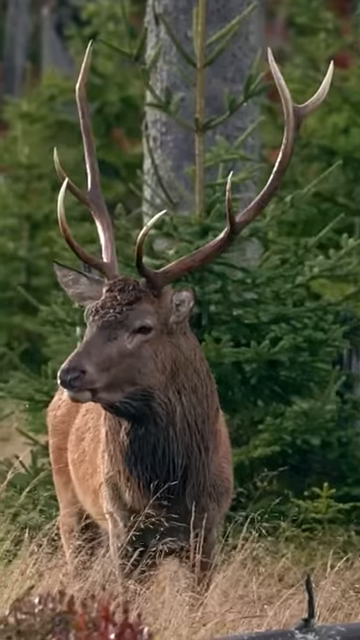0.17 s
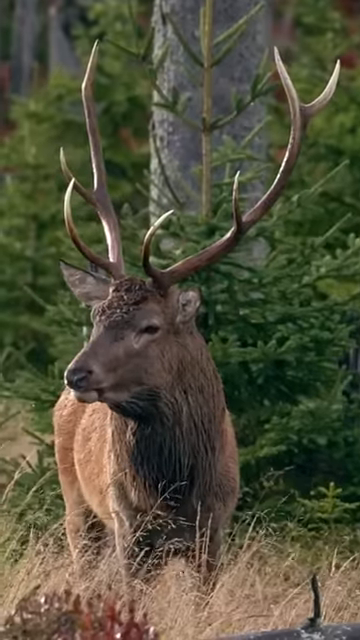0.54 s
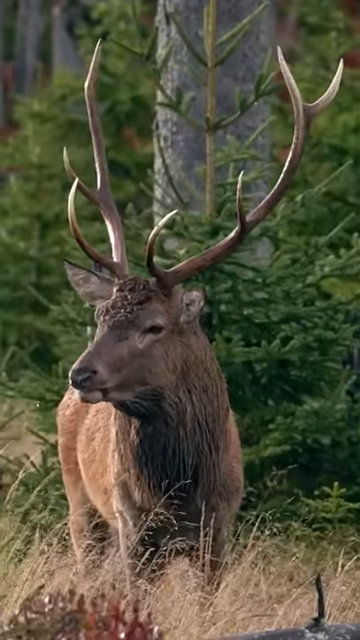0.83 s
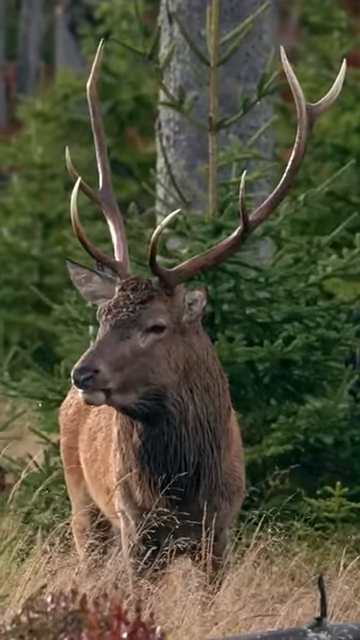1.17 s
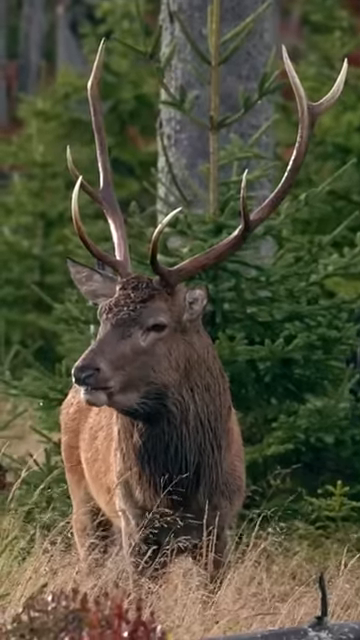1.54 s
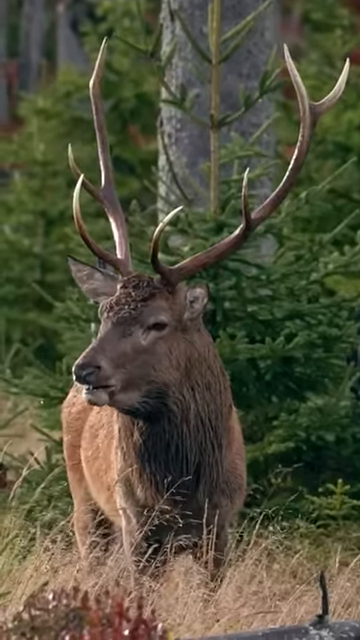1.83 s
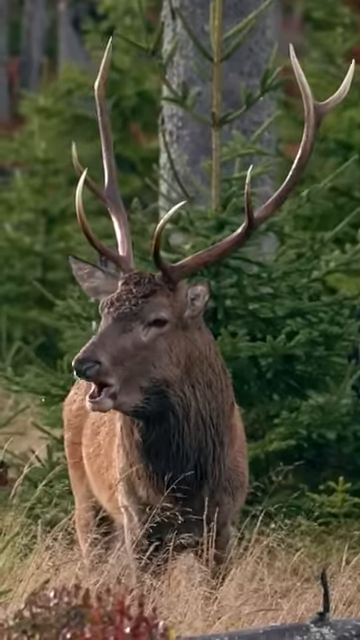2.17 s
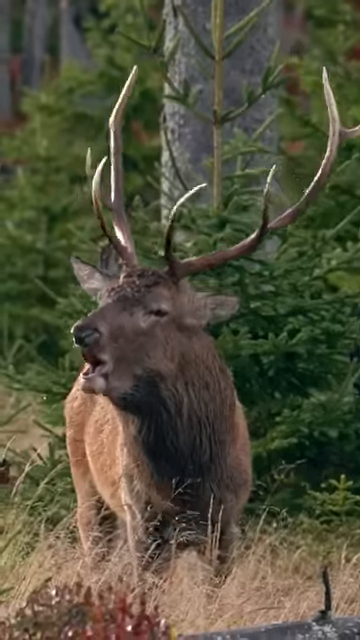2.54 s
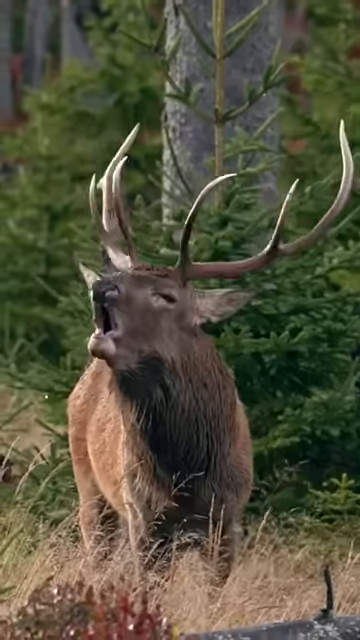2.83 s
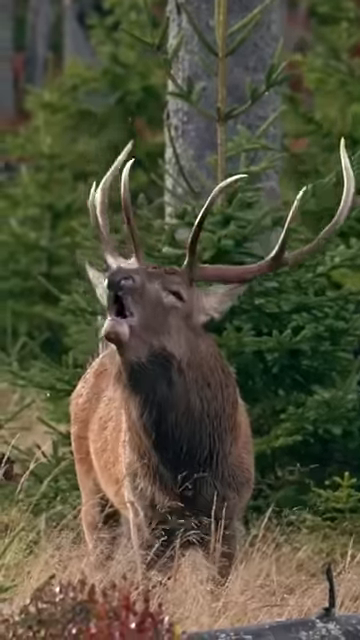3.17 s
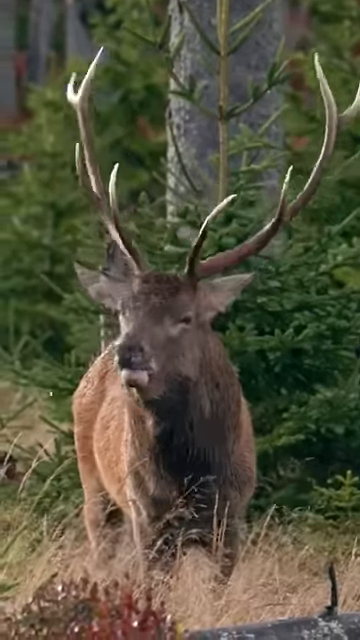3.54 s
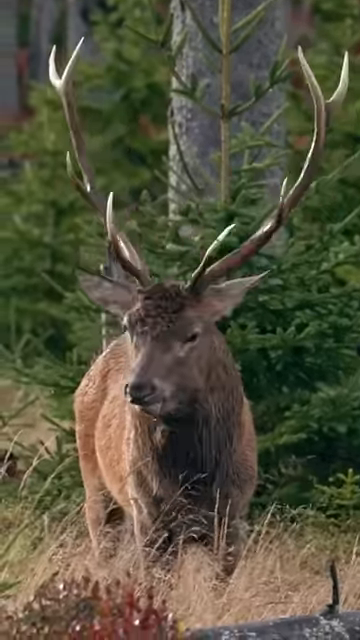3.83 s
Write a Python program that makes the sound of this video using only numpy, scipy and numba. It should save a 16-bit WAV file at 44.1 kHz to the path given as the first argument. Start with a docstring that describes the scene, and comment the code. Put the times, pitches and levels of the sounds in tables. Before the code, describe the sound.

A red deer stag creaks slowly, speeding into a deep rattling groan, pauses, then roars louder and rougher, ending in a few clicks; forest edge, fairly close microphone, faint wind rumble and hiss.

```python
"""Forest edge: a red deer stag calls twice, first a creak that speeds up into a groan, then a loud roar.
Slaps of the vocal folds, with breath between them, ring a bank of throat resonances; as the neck
stretches most of these sink. A dull tail scattered by the trunks follows each call. Behind the stag lie
lumpy noise bands for wind rumble on the microphone, forest hush, a thin wavering hiss and a flat one."""
import sys
import numpy as np
from scipy import signal
from scipy.io import wavfile
from numba import njit

SR = 44100
rng = np.random.default_rng(int(sys.argv[2]) if len(sys.argv) > 2 else 0)


def generate_wav(sig):
    """Save sig (samples, or channels by samples) to the path in sys.argv[1] as 16-bit PCM at SR."""
    pcm = np.round(np.clip(np.atleast_2d(sig).T, -1, 1) * 32767).astype(np.int16)
    wavfile.write(sys.argv[1], SR, pcm)


N = 176400

# Background
# wind rumble: t/s, then level/dB of the deep, the low and the middle band
WIND_GUSTS = [(0.0, -40, -62, -36.5), (0.04, -29.5, -44.5, -42), (0.49, -37, -44.5, -44.5),
              (0.67, -34, -35.5, -31.5), (0.77, -36, -30, -29), (0.81, -44, -37, -42),
              (0.86, -31, -35, -34.5), (1.04, -34.5, -42, -32), (1.24, -30, -48, -54),
              (1.63, -36.5, -43.5, -42.5), (2.9, -34, -31.5, -40.5), (3.17, -29, -48, -29.5),
              (3.23, -34, -36, -43), (3.4, -26, -35.5, -27.5), (3.45, -36, -34, -47),
              (3.49, -25.5, -38, -52), (3.94, -36.5, -25.5, -40), (4.0, -39, -38, -36)]
WIND_EDGES_HZ = [15, 55, 110, 210]
LUMP_DB, LUMPS_PER_S = 2, 8.7
# colour of the forest hush: f/Hz, relative level/dB per Hz
HUSH_COLOUR = [(120, -31), (200, -1), (307, -2), (402, -20), (437, -11.5), (680, -18), (891, -15.5),
               (1490, -27.5), (1760, -23.5), (2120, -30), (6000, -43), (7800, -69), (13200, -120)]
# loudness of the forest hush: t/s, level/dB
HUSH_LEVEL = [(0, -37), (.5, -35.5), (1, -36), (2, -36.5), (2.5, -35), (3.5, -33.5), (4, -36)]
HUSH_FLICKER_DB, HUSH_FLICKERS_PER_S = 0.9, 15.5
# faint narrow hiss that comes and goes: t/s, level/dB
THIN_HISS_LEVEL = [(0, -53), (.2, -59), (.3, -45), (.4, -65), (1.8, -45), (2.0, -57), (2.3, -52.5),
                   (3.5, -59), (4, -55)]
THIN_HISS_HZ, THIN_HISS_WIDTH_HZ = 1790, 70
HISS_DB, HISS_SIDE_DB = -53.5, -19   # the side is relative to the middle
ECHO_DB, ECHO_T60_S, ECHO_RISE_S, ECHO_LOWPASS_HZ = -16.5, 0.66, 0.021, 1000
CUTOFF_HZ = 15450

# Stag
# single slaps of the vocal folds before the groan: t/s, peak level/dB into the throat
GROAN_CREAK = [(0.3616, -28), (0.4324, -23.5), (0.4738, -25), (0.5104, -23.5), (0.5435, -25), (0.5764, -27),
               (0.612, -32.5), (0.6452, -35.5), (0.6868, -43), (0.7238, -35), (0.7612, -34), (0.8025, -28),
               (0.8395, -27), (0.8704, -24.5), (0.898, -24)]
# single slaps before and after the roar: t/s, peak level/dB into the throat
ROAR_CREAK = [(2.387, -29), (2.4197, -20), (3.4085, -17), (3.4386, -20.5), (3.4526, -28)]
# course of the groan: t/s, slap rate/Hz, slap height/dB before SLAP_TRIM_DB, throat stretch/0-1,
# boost of the low resonances/dB, roughness/0-1
GROAN_COURSE = [(.9215, 45.4, -23, 0.13, 2.5, .02), (.961, 47.5, -22, 0.38, 2.5, 0),
                (1.011, 54.6, -21.5, 0.36, 1, 0.1), (1.071, 58.7, -22, 0.06, 4, 0),
                (1.15, 60.6, -20, 0.27, 5, 0.11), (1.22, 62.4, -15, 0.66, -4.5, 0.06),
                (1.27, 64, -11.5, 0.82, -0.5, .03), (1.4, 64, -10, 0.92, -1.5, 0.02),
                (1.46, 63, -11, 0.9, -1, 0.07), (1.52, 63.7, -9.5, 0.95, -3, 0.11),
                (1.58, 62.5, -9.5, 1, -5, 0.14), (1.65, 61.5, -10.5, 0.9, -0.5, 0.17),
                (1.7, 61, -22.5, 0.92, 12, 0.26), (1.78, 60, -43, 0.8, -14, .3)]
# course of the roar: columns as in GROAN_COURSE
ROAR_COURSE = [(2.443, 44.13, -10.5, 0.07, 0, 0.018), (2.475, 51.8, -10.5, .05, 0, 0.022),
               (2.5, 63.95, -8.5, 0.13, 0.052, 0.026), (2.55, 68.7, -10, 0.29, 0, 0.066),
               (2.62, 73.73, -9.5, 0.404, 0, 0.081), (2.7, 75.94, -10.5, .58, 0, .1),
               (2.8, 81.27, -10.5, 0.812, 0.0067, 0.13), (2.88, 87.17, -14, .84, 0, 0.19),
               (2.95, 92.93, -12, 0.91, 0, 0.12), (3.04, 96.56, -13, 0.93, 0, 0.032),
               (3.12, 92.5, -11.5, .96, 0, 0.17), (3.2, 87.51, -15, 0.95, 0, 0.11),
               (3.27, 79.14, -13.5, .99, 0.029, 0.28), (3.32, 67.18, -13.5, 0.96, 0.014, 0.16),
               (3.36, 59.2, -12, 0.91, 0.00071, 0.16), (3.395, 46.83, -18, .99, 0, 0.25)]
# throat resonances of the groan: f short/Hz, f stretched/Hz, level short/dB, level stretched/dB,
# width/Hz (the top ones are at least TOP_WIDTH_HZ wide)
GROAN_THROAT = [(346, 337, -25, -12, 76), (530, 580.4, -8, -11.5, 51), (709, 728, -14, -23.5, 40),
                (970, 898, -27, -13.5, 55), (1106, 1050, -22.5, -10.5, 48), (1260, 1320, -15, -14, 150),
                (1575, 1500, -19, -16.5, 31), (1755, 1715, -6, -9, 41), (2030, 1910, 0.5, -5, 55),
                (2374, 2270, -18.5, -13, 35.5), (2480, 2900, -19, -29.5, 23), (2880, 2800, -13.5, -42, 90),
                (3730, 3490, -20, -32, 74), (4030, 3960, -24, -29, 310), (4350, 4250, -21, -29.5, 210),
                (4800, 4700, -24, -34, 350)]
# throat resonances of the roar: columns as in GROAN_THROAT
ROAR_THROAT = [(408, 347.2, -14, -2, 15.3), (797, 469.7, -19.5, -4.5, 16.5), (956, 550, -13.5, -34, 36),
               (1180, 787, -9.5, -7, 50), (1536, 1125, -19.5, -7, 28), (1074, 1100, -25, -17, 16),
               (2040, 1640, -0.5, -8, 51), (2260, 1820, -23, -16.5, 19), (2434, 1990, -1, -11, 61),
               (2650, 2210, -28, -24, 20), (3000, 2470, -27, -22.5, 17), (2890, 2650, -30, -27.5, 16.7),
               (3480, 3600, -51, -43, 24), (3570, 3200, -29.5, -17, 99), (4020, 3500, -29.5, -18, 100),
               (4240, 3920, -27, -29.5, 72), (4680, 4180, -37, -22, 92), (4800, 4380, -32, -20, 120),
               (4360, 4500, -33, -29, 91)]
# polarity of each resonance: like neighbours leave a notch
GROAN_SIGNS, ROAR_SIGNS = "-+-+---+++-+-+-+", "+--+-+----+-++--+-+"
SLAP_TRIM_DB = -0.5
# per unit of roughness: pulse timing in cycles, slap height in dB, breath relative to a slap in dB
JITTER, SHIMMER_DB, BREATH_DB = .03, 6, -18.04
WAVER_DB, WAVERS_PER_S = 11, 10   # each resonance swells and fades by itself, per unit of roughness
# these three limits are compared with the stretched frequency of a resonance
BOOST_UNDER_HZ, SKIRT_UNDER_HZ, TOP_OVER_HZ = 1200, 2400, 3000
TOP_WIDTH_HZ, RASP_DB = 110, -27   # the top resonances also ring with breath, relative to the puff
SKIRT_LOWPASS_HZ = 2810   # steep fall above the lower resonances
VOICE_LOW_HZ, VOICE_TOP_HZ = 269, 4750
AIR_HZ, GROAN_AIR_DB, ROAR_AIR_DB = 6200, -58, -43.5   # airy hiss above the resonances, relative to the puff


def amp(db):
    """Turn decibels into a linear gain."""
    return 10 ** (np.asarray(db) / 20)


def unit(x):
    """Scale to rms 1."""
    return x / np.sqrt(np.mean(x ** 2) + 1e-20)


def in_time(rows):
    """Draw each column of a table as a curve over the whole scene."""
    s, *columns = np.transpose(rows)
    return [np.interp(np.arange(N) / SR, s, c) for c in columns]


def drift(rate_hz):
    """Slow random wander with rms 1: low-passed noise made at a fortieth of the sample rate."""
    r = np.exp(-80 * np.pi * rate_hz / SR)
    noise = rng.standard_normal(N // 40 + 2002)
    slow = signal.lfilter([1], [1, -2 * r, r * r], noise)[2000:]
    return np.interp(np.arange(N) / 40, np.arange(len(slow)), unit(slow))


def band(low_hz, high_hz, order=2):
    """Band of noise with rms 1; the first second lets the filter settle."""
    sos = signal.butter(order, [low_hz, high_hz], "band", fs=SR, output="sos")
    return unit(signal.sosfilt(sos, rng.standard_normal(N + SR))[SR:])


def cut(x, hz, kind):
    """Steep low or high cut."""
    return signal.sosfilt(signal.butter(5, hz, kind, fs=SR, output="sos"), x + 1e-18)


def hiss():
    """Flat recorder hiss: white noise, nearly the same in both channels."""
    mid, side = rng.standard_normal((2, N))
    return amp(HISS_DB) * (mid + amp(HISS_SIDE_DB) * side * [[1], [-1]])


def hush():
    """Forest hush: half-octave bands of noise, each flickering a little by itself."""
    hz, db = np.transpose(HUSH_COLOUR)
    edges = 200 * 2 ** np.arange(0, 5.1, .5)
    # neighbouring bands draw on different noises
    white = rng.standard_normal((2, N))
    out = 0
    for k, (low, high) in enumerate(zip(edges, edges[1:])):
        sos = signal.butter(2, [low, high], "band", fs=SR, output="sos")
        part = signal.sosfilt(sos, white[k % 2])
        colour_db = np.interp(np.log(low * high) / 2, np.log(hz), db)
        out = out + part * amp(colour_db + HUSH_FLICKER_DB * drift(HUSH_FLICKERS_PER_S))
    return amp(in_time(HUSH_LEVEL)[0]) * unit(out)


def wind():
    """Wind on the microphone: three bands of low rumble, each with its own level curve and lumps."""
    return sum(amp(db + LUMP_DB * drift(LUMPS_PER_S)) * band(low, high)
               for db, low, high in zip(in_time(WIND_GUSTS), WIND_EDGES_HZ, WIND_EDGES_HZ[1:]))


def thin_hiss():
    """A narrow noise band, almost a whistle, that comes and goes."""
    half = THIN_HISS_WIDTH_HZ / 2
    return amp(in_time(THIN_HISS_LEVEL)[0]) * band(THIN_HISS_HZ - half, THIN_HISS_HZ + half, order=1)


def forest_echo(x):
    """Trunks scatter back a dull tail: low-passed noise that rises briefly, then decays."""
    t = np.arange(SR) / SR
    tail = rng.standard_normal(SR) * amp(-60 * t / ECHO_T60_S) * np.clip(t / ECHO_RISE_S, 0, 1)
    tail = signal.sosfilt(signal.butter(2, ECHO_LOWPASS_HZ, fs=SR, output="sos"), tail)
    return amp(ECHO_DB) * signal.fftconvolve(x, tail / np.linalg.norm(tail))[:N]


@njit
def ring(drive, angle, r):
    """A resonance (two-pole) whose centre moves sample by sample."""
    out = np.zeros(len(drive))
    for i in range(2, len(drive)):
        feedback = 2 * r * np.cos(angle[i]) * out[i - 1] - r * r * out[i - 2]
        out[i] = feedback + np.sin(angle[i]) * drive[i - 1]
    return out


def folds(rate, height_db, rough, a, b):
    """Vocal folds: a slap at each new cycle, breath that fades through it, and the puff of air behind."""
    n = np.arange(N)
    phase = np.cumsum(rate * (n >= a)) / SR
    phase = phase + JITTER * rough * drift(40) * (n > a + 200)
    # jitter must not count a cycle twice
    turns = np.maximum.accumulate(np.floor(phase))
    slaps = np.diff(turns, prepend=0) * amp(SHIMMER_DB * rough * rng.standard_normal(N))
    slaps[a] = 1
    breath = amp(BREATH_DB) * rough * rng.standard_normal(N) * (1 - phase % 1) ** 2
    height = amp(height_db + SLAP_TRIM_DB) * (n >= a) * (n < b)
    puff = height * (1 - phase % 1 / 2)
    return (slaps + breath) * height, puff


def call(course, creak, throat, signs, air_db):
    """Fold slaps and breath ring the throat; stretch slides its resonances, most of them downward."""
    rate, height_db, stretch, boost_db, rough = in_time(course)
    rough = np.clip(rough, 0, 1)
    a, b = int(course[0][0] * SR), int(course[-1][0] * SR)
    drive, puff = folds(rate, height_db, rough, a, b)
    rasp = amp(RASP_DB) * puff * rng.standard_normal(N)
    for s, db in creak:
        drive[int(s * SR)] += amp(db)
    # ring only from the first slap to half a second past the end
    start = int(min(course[0][0], creak[0][0]) * SR) - 10
    span = slice(start, min(b + SR // 2, N))
    stretch = np.clip(stretch[span], 0, 1.1)
    upper, lower = np.zeros((2, N))
    for (hz0, hz1, db0, db1, width), sign in zip(throat, signs):
        waver_db = WAVER_DB * rough * drift(WAVERS_PER_S)
        level_db = db0 + (db1 - db0) * stretch
        gain = amp(level_db + boost_db[span] * (hz1 < BOOST_UNDER_HZ) + waver_db[span])
        top = hz1 > TOP_OVER_HZ
        width = max(width, TOP_WIDTH_HZ * top)
        angle = 2 * np.pi * (hz0 + (hz1 - hz0) * stretch) / SR
        push = (drive + top * rasp)[span] * gain + 1e-18
        group = lower if hz1 < SKIRT_UNDER_HZ else upper
        group[span] += int(sign + "1") * ring(push, angle, np.exp(-np.pi * width / SR))
    voice = upper + cut(lower, SKIRT_LOWPASS_HZ, "low")
    voice = cut(cut(voice, VOICE_TOP_HZ, "low"), VOICE_LOW_HZ, "high")
    air = amp(air_db) * puff * band(AIR_HZ * .8, AIR_HZ * 1.3)
    return voice + air


def scene():
    """Lay the groan, the roar and their echo over the background."""
    groan = call(GROAN_COURSE, GROAN_CREAK, GROAN_THROAT, GROAN_SIGNS, GROAN_AIR_DB)
    roar = call(ROAR_COURSE, ROAR_CREAK, ROAR_THROAT, ROAR_SIGNS, ROAR_AIR_DB)
    stag = groan + roar
    return hiss() + hush() + wind() + thin_hiss() + forest_echo(stag) + stag


def record(dry):
    """A very steep low-pass cuts the top."""
    return signal.sosfilt(signal.ellip(12, .5, 70, CUTOFF_HZ, fs=SR, output="sos"), dry)


dry = scene()
out = record(dry)
generate_wav(out)
```